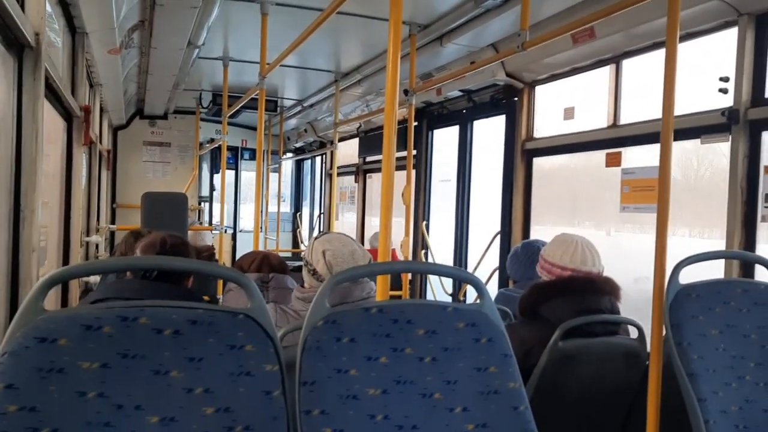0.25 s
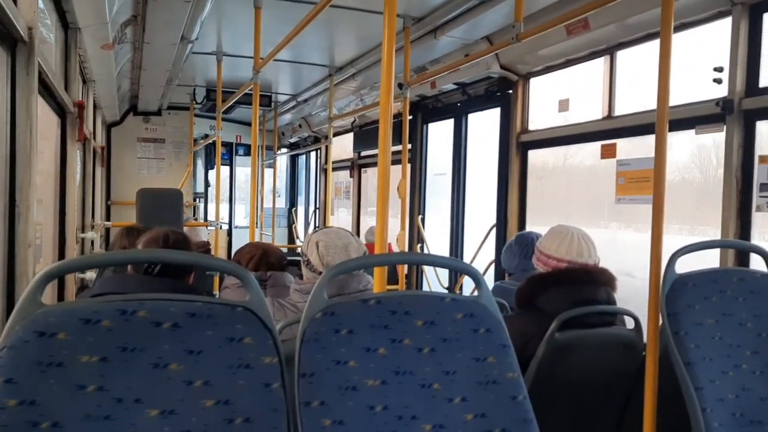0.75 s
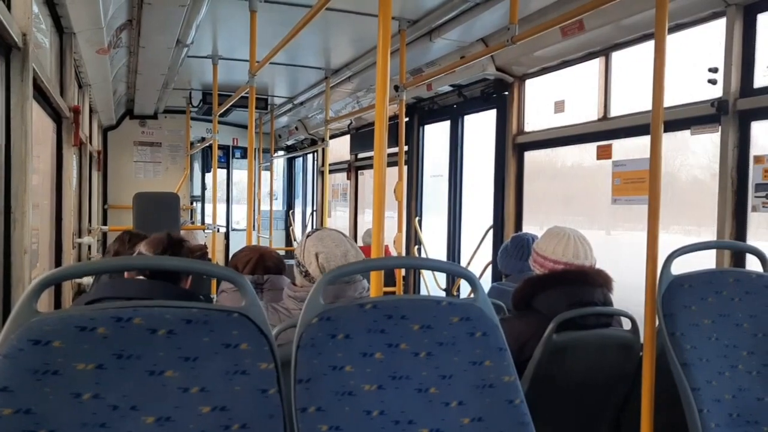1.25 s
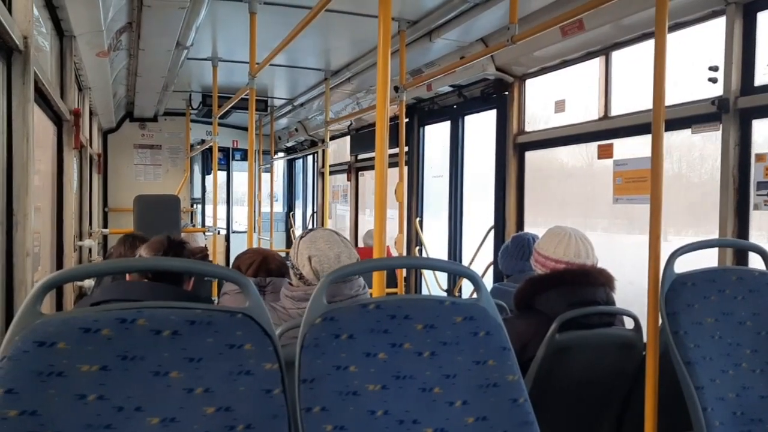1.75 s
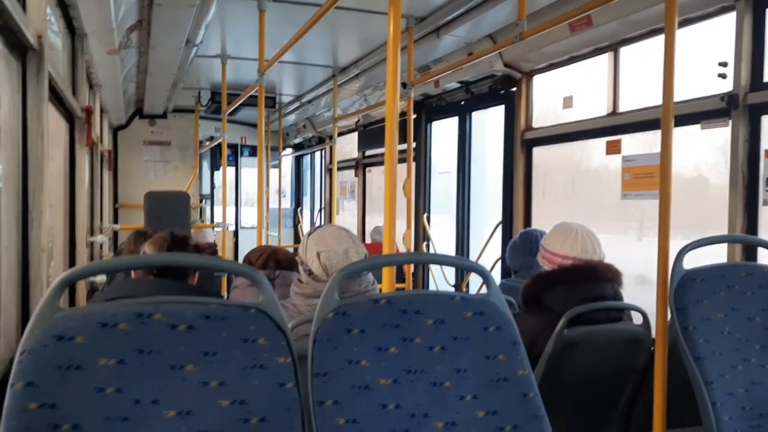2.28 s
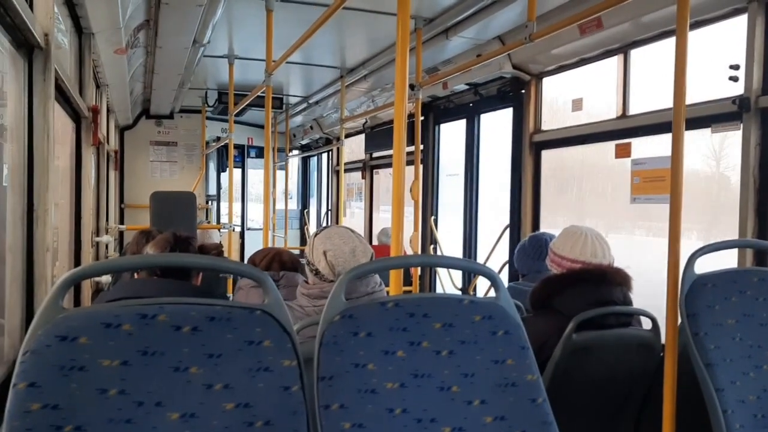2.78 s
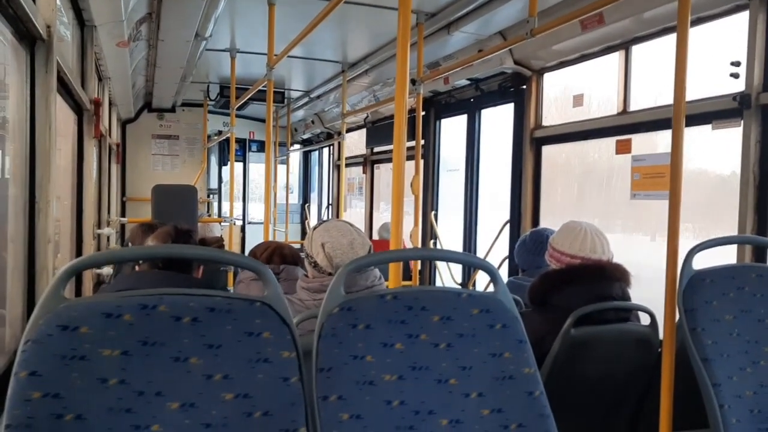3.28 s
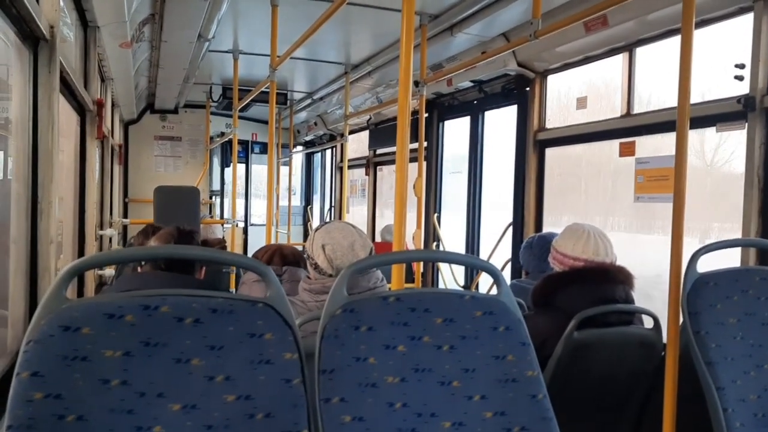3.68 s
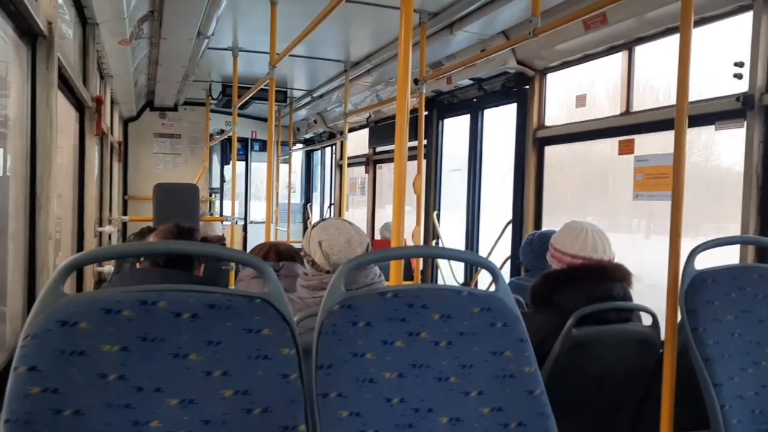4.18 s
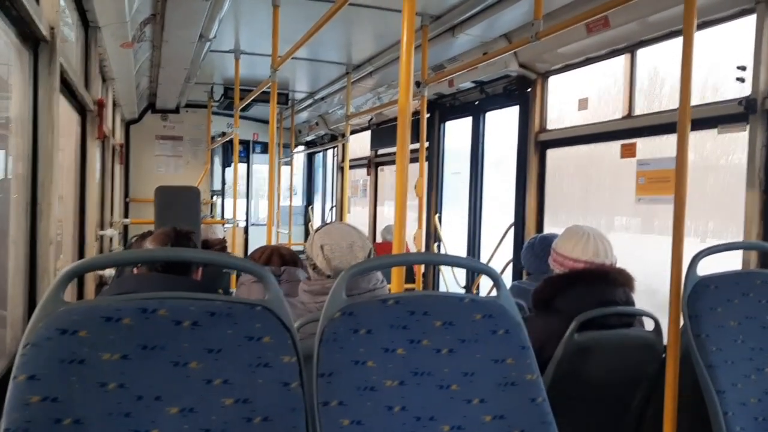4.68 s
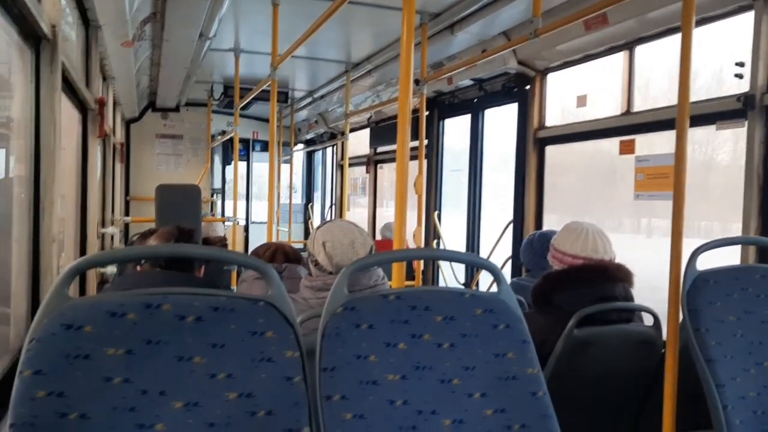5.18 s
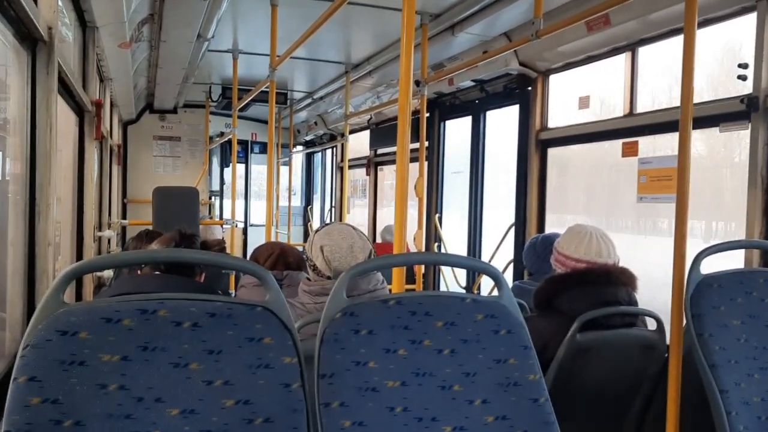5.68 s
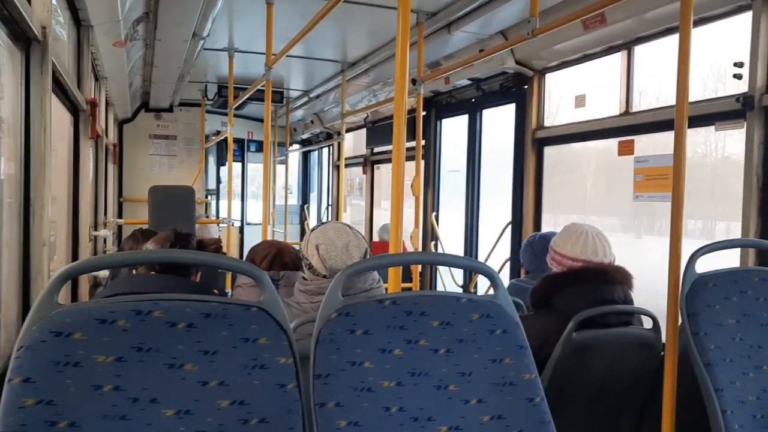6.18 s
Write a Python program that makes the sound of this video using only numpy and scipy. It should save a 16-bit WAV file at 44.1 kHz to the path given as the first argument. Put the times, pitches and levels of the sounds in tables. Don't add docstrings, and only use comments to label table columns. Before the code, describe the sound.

Inside a moving electric bus on snow, a deep cabin drone surges over road rumble, with motor whine, tyre hiss, ticks and small clinks.

```python
import sys
import numpy as np
from scipy import signal
from scipy.fft import rfft, irfft, next_fast_len
from scipy.io import wavfile
from scipy.ndimage import uniform_filter1d

SR = 44100
rng = np.random.default_rng(int(sys.argv[2]) if len(sys.argv) > 2 else 0)


def unload_wav(signal):
    wavfile.write(
        sys.argv[1],
        SR,
        np.round(np.clip(np.atleast_2d(signal).T, -1, 1) * 32767).astype(np.int16),
    )


def ratio_of_db(decibels):
    return 10 ** (np.asarray(decibels, float) / 20)


N = 284445
TIME = np.arange(N) / SR
LENGTH = next_fast_len(N, real=True)
HZ = np.fft.rfftfreq(LENGTH, 1 / SR) + 1e-3
PORTS = np.array([[1], [-1]])

# (t/s, length/s, level/dB rms, f/Hz)
SURGES = [(0.03, 0.05, -23.5, 138), (0.297, 0.062, -21.5, 141), (0.617, 0.13, -27, 136.9),
          (0.953, 0.054, -22.5, 138), (1.255, 0.069, -20, 143), (1.43, 0.45, -20, 139.5),
          (1.996, 0.082, -21.5, 149.3), (2.201, 0.1, -22, 140.5), (2.338, 0.051, -21, 152.2),
          (2.504, 0.16, -16.5, 139.6), (2.76, 0.16, -18, 141.3), (2.987, 0.061, -16, 140.6),
          (3.094, 0.043, -19.5, 136.5), (3.18, 0.031, -16.5, 148.9), (3.321, 0.034, -21, 149.8),
          (3.54, .1, -21.5, 147.4), (3.678, 0.075, -18, 149), (3.856, 0.15, -19, 139.3),
          (4.122, 0.041, -18.5, 142), (4.302, 0.16, -21.5, 140.9), (4.497, 0.095, -20.5, 153.3),
          (4.665, .12, -18.5, 148.5), (4.803, 0.052, -18, 141), (4.888, 0.048, -17.5, 141.6),
          (4.994, 0.084, -18.5, 143), (5.457, 0.15, -21, 140), (5.634, 0.2, -23, 141.7),
          (5.896, .1, -23.5, 168), (6.079, 0.12, -21.5, 134.3), (6.399, 0.045, -16.5, 138.6)]
REST_DB, REST_HZ = -30, 143
# (t/s, level/dB re full pull)
TORQUE = [(0.0, -4), (1.1, -5), (1.35, -2.5), (1.65, -4), (1.85, -5.5), (2.1, -1), (2.25, -2.5), (2.5, -9),
          (4.2, -13.5), (5.0, -11.5), (6.45, -4)]


def unit(x):
    return x / np.sqrt(np.mean(x ** 2))


def wave(spectrum):
    return irfft(spectrum, LENGTH)[..., :N]


def along(table):
    hz, value = np.transpose(table)
    return np.interp(np.log(HZ), np.log(hz), value)


def in_time(table):
    return np.interp(TIME, *np.transpose(table))


def walk(rate):
    k = int(SR / rate)
    held = np.repeat(rng.standard_normal(N // k + 1), k)
    return 1.25 * uniform_filter1d(uniform_filter1d(held, k), k)[:N]


def swells(rows, rise_s, fall_s):
    s, length, db = (c[:, None] for c in np.transpose(rows)[:3])
    early = np.clip(s - TIME, 0, None) / rise_s
    late = np.clip(TIME - s - length, 0, None) / fall_s
    return ratio_of_db(db) * np.exp(-early ** 2 - late ** 2)


def over(rest_db, envelopes):
    return 10 * np.log10(ratio_of_db(rest_db) ** 2 + envelopes.max(0) ** 2)


def resonance(hz, width_hz):
    return 1 / (1 + 1j * (HZ ** 2 - hz ** 2) / (HZ * width_hz))


def field():
    # (f/Hz, likeness -1..1)
    likeness = [(60, 1), (170, 0.96), (300, 0.69), (600, 0.44), (800, -0.095), (1200, -0.09), (1450, -0.24),
                (2000, -0.026), (2300, 0.16), (3500, -0.11), (7300, 0.17), (7700, 1), (9600, 0.78),
                (9900, 1), (15000, 0.79)]
    # (f/Hz, left minus right/dB)
    balance = [(50, -1.7), (140, 3), (300, 0.7), (500, -0.5), (800, 5), (1300, -0.7), (3500, 0.5),
               (5900, -9.5), (7400, -6.5), (9000, -9), (10500, -2)]
    alike = np.clip(along(likeness), -.999, .999)
    mid, side = rfft(rng.standard_normal((2, LENGTH)))
    both = np.sqrt(1 + alike) * mid + PORTS * np.sqrt(1 - alike) * side
    return both * ratio_of_db(PORTS * along(balance) / 2)


def steady(x, share, span_s=0.043):
    power = uniform_filter1d(unit(x.mean(0)) ** 2, int(span_s * SR))
    return x / np.sqrt(power + 0.051) ** np.clip(share, 0, 1)


def rung(modes, share):
    noise = field()
    out = 0
    for hz, width_hz, db in modes:
        ring = unit(wave(noise * resonance(hz, width_hz) ** 2))
        out = out + ratio_of_db(db) * steady(ring, share)
    return out


def road_roughness():
    # (t/s, level/dB re average)
    roughness = [(0.0, 2.5), (0.06, 0), (1.0, 0.1), (1.27, 2.5), (2.3, 1.6), (2.5, 1.5), (2.7, -0.3),
                 (3.3, 0.36), (4.5, 0.5), (4.95, -0.2), (5.2, 0.5), (6.1, 0.6), (6.32, 0.5), (6.45, 1.2)]
    return in_time(roughness)


def floor_shake():
    # (t/s, length/s, level/dB)
    ruts = [(0.058, 0.044, -24), (0.321, 0.037, -22), (1.24, 0.047, -23), (1.559, 0.099, -27),
            (1.684, 0.056, -26), (1.768, 0.174, -21.5), (2.015, 0.067, -21), (2.141, 0.046, -23.5),
            (2.251, 0.164, -24.5), (2.445, 0.052, -23), (2.633, 0.05, -24), (3.336, 0.2, -23.5),
            (3.583, 0.042, -22.5), (3.805, 0.069, -25.5), (4.037, 0.16, -18.5), (4.362, 0.049, -22),
            (4.656, 0.047, -29), (4.957, 0.05, -24), (5.097, 0.13, -19), (5.272, 0.092, -24.5),
            (5.381, 0.034, -23), (5.507, 0.041, -23.5), (5.674, 0.06, -22.5), (5.911, 0.034, -21.5),
            (5.977, 0.191, -20.5), (6.41, 0.027, -21)]
    return over(-28, swells(ruts, rise_s=0.038, fall_s=0.047))


def tyre_hiss(road_db):
    # (t/s, length/s, level/dB over the dry hiss)
    slush = [
        (0.0, 0.018, -17),
        (1.3, 0.073, -2),
        (1.6, 0.21, -2),
        (2.36, 0.13, -3),
        (2.72, 0.22, -6.5),
        (3.27, 0.22, -3.5),
        (3.95, .15, -8),
        (5.12, 0.18, -4),
        (6.4, 0.059, -5),
    ]
    return road_db + over(0.1, swells(slush, rise_s=0.04, fall_s=0.11))


def broadband(shake_db, boom_db, roar_db, hiss_db):
    # (f/Hz, level/dB per Hz)
    noise_colour = [(15, -47), (25, -35), (35, -24), (50, -27), (65, -7.5), (107, -5.5), (145, -6), (210, -15),
                    (350, -14), (415, -14.5), (507, -21.5), (556, -22), (592, -23), (1000, -25.5),
                    (1350, -28.5), (2200, -31), (2800, -35.5), (3500, -39), (4800, -40.5), (6400, -42), (7300, -47),
           (8900, -47.5), (9900, -51.5), (12500, -48.5), (14500, -53), (15600, -54.5)]
    spectrum = field() * ratio_of_db(along(noise_colour))
    centres = 25 * 2 ** np.arange(0, 9.6, .5)
    swing = np.array([c - c.mean() for c in (shake_db, boom_db, roar_db, hiss_db)])
    spray = walk(9) + 0.83 * walk(22.25)
    out = 0
    for hz in centres:
        place = np.interp(np.log(hz), np.log([90, 140, 220, 1800, 5000]), [0, 1, 2, 2, 3])
        share = np.clip(1 - abs(place - np.arange(4)), 0, 1)
        mask = np.cos(np.pi * np.clip(np.log2(HZ / hz), -.5, .5)) ** 2
        db = share @ swing + 0.23 * walk(7) + .5 * spray * np.clip(hz / 9000, 0, 1)
        out = out + ratio_of_db(db) * steady(wave(spectrum * mask), 1.07 * (hz < 220))
    return ratio_of_db(-23.0) * unit(out)


def cabin_modes(shake_db, boom_db):
    # (f/Hz, width/Hz, level/dB)
    modes = [
        (72.3, 37, -3),
        (163.4, 31.4, -3.5),
    ]
    unloaded_db = -0.37 * in_time(TORQUE)
    cabin_db = uniform_filter1d(boom_db, SR // 2) + unloaded_db - 6.5
    return ratio_of_db(shake_db) * rung(modes[:1], 0.88) + ratio_of_db(cabin_db) * rung(modes[1:], 0.41)


def panels(road_db):
    # (f/Hz, width/Hz, level/dB rms)
    modes = [
        (35, 8.1, -39),
        (310, 46, -42),
        (380.2, 7.4, -43.5),
        (639, 14, -49),
        (432.5, 6.1, -43),
    ]
    return ratio_of_db(road_db) * rung(modes, 0.44)


def gears():
    # (multiple, level/dB, left minus right/dB, left lead/rad)
    main_orders = [
        (3, -3, -1, 0.75),
        (4, -0.5, 3, 0.058),
        (6, -2.5, -4, -1.3),
    ]
    # (multiple, level/dB, left minus right/dB, left lead/rad)
    side_orders = [
        (2, -5.5, 4, -0.018),
        (3.5, -4, 2, 0.56),
        (4.5, -11.5, -4, 0.54),
        (5, -14, 0, .3),
    ]
    # (level/dB at full pull, dB of level per dB of torque)
    loading = [
        (-29, 1.65),
        (-39, 0.74),
        (-42, 1),
    ]
    # (t/s, length/s, level/dB over usual)
    singing = [
        [(0.1, 0.4, -5), (0.6, 0.55, 0.5), (1.3, 0.48, -3), (2.0, 0.2, 4)],
        [(0.2, 1, -4), (1.25, .55, -4), (2.28, 0.083, -1)],
        [(1.28, 0.33, 5.5), (2.0, 0.16, 6)],
    ]
    lift_s = 2.27
    pull, coast = np.minimum(TIME, lift_s), np.clip(TIME - lift_s, 0, None)
    mesh_hz = 135.4 + 2.2 * pull - 1.2 * coast
    torque_db = in_time(TORQUE)
    levels = []
    for (db, follow), rows in zip(loading, singing):
        song_db = over(0, swells(rows, rise_s=0.057, fall_s=.05))
        levels.append(db + follow * torque_db + song_db)
    levels += [levels[1]] * len(side_orders)
    turn = 2 * np.pi * np.cumsum(mesh_hz + 0.342 * walk(8)) / SR
    out = 0
    for level_db, (multiple, db, lean_db, lead) in zip(levels, main_orders + side_orders):
        gain = np.sqrt(2) * ratio_of_db(level_db + db + walk(11) + PORTS / 2 * lean_db)
        start = 2 * np.pi * rng.random()
        out = out + gain * np.sin(multiple * turn + PORTS / 2 * lead + start)
    return out


def drone(surges):
    pull_hz = np.transpose(SURGES)[3] @ surges
    hz = (ratio_of_db(REST_DB) * REST_HZ + pull_hz) / (ratio_of_db(REST_DB) + surges.sum(0))
    turn = 2 * np.pi * np.cumsum(hz + 1.802 * walk(23)) / SR
    level_db = over(REST_DB, surges) - 2.5 + 0.76 * walk(25) + 3.3 * PORTS / 2
    return np.sqrt(2) * ratio_of_db(level_db) * np.sin(turn - 0.09 * PORTS / 2)


def burst(s, t60, hold, rise):
    place = slice(int(s * SR), int(s * SR) + SR // 3)
    age = TIME[place] - s
    decay = 1000. ** (-np.clip(age - hold, 0, None) / t60)
    return place, np.clip(age / rise, 0, 1) * decay


def fittings():
    # (t/s, peak level/dB, lower band re upper/dB)
    ticks = [(0.3611, -29, -5), (0.6401, -31, -12), (1.2797, -27, -8), (1.5898, -34, -1), (1.708, -31, -13),
             (1.783, -30, -16), (1.9094, -26, -23), (2.2945, -29, -14), (2.405, -27, -6),
             (2.4467, -29, -22), (2.6937, -43.5, 10), (2.7146, -30, -8), (3.4312, -31, -5),
             (3.649, -30, -5), (3.949, -32, -4), (4.3194, -37, 0), (4.4315, -34, -19), (4.7381, -34, -6),
             (5.125, -31, -2), (5.2784, -28, -17), (5.3086, -34, -7), (5.7539, -39, -6), (6.3859, -28, -5),
             (6.4187, -39, -10)]
    # (t/s, level/dB, t60/s, chatter/s, rise/s, snap of first contact)
    clinks = [
        (2.0665, -38.5, 0.22, 0.016, 0.0006, 2.0),
        (3.286, -37.5, 0.17, 0.036, 0.012, 0.1),
    ]
    # (f/Hz, width/Hz, level/dB)
    clink_modes = [
        [(5250, 200, -4.5), (5950, 1370, 2.5), (8640, 1600, -3.5), (13000, 1100, -4), (11500, 6100, 2)],
        [(5880, 2500, 3.5), (8890, 790, 0), (8630, 1190, -1), (11700, 3600, 5), (14300, 2600, -1)],
    ]
    noise, out = field(), np.zeros((2, N))
    upper = unit(wave(noise * resonance(12300, 7000) ** 2))
    lower = unit(wave(noise * resonance(6400, 4800) ** 2))
    for s, db, rel_db in ticks:
        place, shape = burst(s, t60=.028, hold=0.004, rise=0.00082)
        metal = upper[:, place] + ratio_of_db(rel_db + 5) * lower[:, place]
        out[:, place] += ratio_of_db(db - 12.5) * shape * metal
    for (s, db, *timing, snap), modes in zip(clinks, clink_modes):
        place, shape = burst(s, *timing)
        response = 0
        for hz, width_hz, mode_db in modes:
            mode = resonance(hz, width_hz) ** 2
            response = response + ratio_of_db(mode_db) * mode / np.sqrt(2 * np.mean(abs(mode) ** 2))
        ring = wave(noise * response)
        shape *= 1 + snap * np.exp(-np.arange(len(shape)) / (0.003 * SR))
        out[:, place] += shape * (ratio_of_db(db - 5.0 + 1.8 * walk(200)) * ring)[:, place]
    return out


def knocks():
    # (t/s, level/dB rms, f/Hz, width/Hz)
    twists = [
        (1.70, -33.5, 680, 51),
        (1.38, -40, 670, 45),
        (3.3, -34, 580, 87),
        (2.5, -28, 195, 21),
        (6.1, -34, 195, 25),
        (1.72, -29, 170, 30),
        (5.92, -41, 660, 40),
        (4.12, -30.5, 270, 50),
        (4.62, -32, 275, 57),
    ]
    rings = swells([(s, 1 / width_hz, db) for s, db, hz, width_hz in twists], 0.01, 0.024)
    out = 0
    for ring, (_, _, hz, _) in zip(rings, twists):
        out = out + np.sqrt(2) * ring * np.sin(2 * np.pi * hz * TIME + 0.4 * PORTS / 2)
    return out


def scene():
    road_db, shake_db = road_roughness(), floor_shake()
    surges = swells(SURGES, rise_s=0.026, fall_s=0.028)
    boom_db = over(-24.0, surges)
    road = broadband(shake_db, boom_db, road_db, tyre_hiss(road_db))
    body = cabin_modes(shake_db, boom_db) + panels(road_db)
    return road + body + gears() + drone(surges) + fittings() + knocks()


def narrowed(x):
    size, open_share = 1024, .36
    lead = size - 567
    patch_bins = np.arange(352, 769, 32)
    frame = dict(window="cosine", nperseg=2 * size, noverlap=size)
    padded = np.pad([x[0] + x[1], x[0] - x[1]], ((0, 0), (lead, 0))) / 2
    mid, side = signal.stft(padded, **frame)[2]
    frames = mid.shape[1]
    joint = rng.random(frames) > open_share
    for k, (low, high) in enumerate(zip(patch_bins, patch_bins[1:])):
        lean_share, reach = (.85, .4) if k < 3 else (0.27, 1)
        need = uniform_filter1d(rng.standard_normal(frames), size=2)
        leans = need > np.quantile(need, 1 - lean_share)
        angle = leans * np.clip(rng.uniform(-2.2, 1.9, frames) * reach, -1.5, 1.5)
        side[low:high] = np.where(joint, mid[low:high] * np.sin(angle), side[low:high])
        mid[low:high] *= np.where(joint, np.cos(angle), 1)
    mid, side = signal.istft(np.array([mid, side]), **frame)[1][:, lead:lead + N]
    return np.array([mid + side, mid - side])


def band_limit(x):
    return signal.sosfilt(signal.butter(12, 15800, fs=SR, output="sos"), x)


def record(dry):
    rounded = np.tanh(1.1 * dry) / 1.05
    top = signal.ellip(8, .2, 50, 15760, fs=SR, output="sos")
    mix = narrowed(signal.sosfilt(top, rounded))
    return band_limit(mix)


dry = scene()
out = record(dry)
unload_wav(out)
```